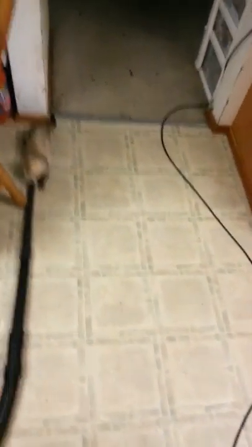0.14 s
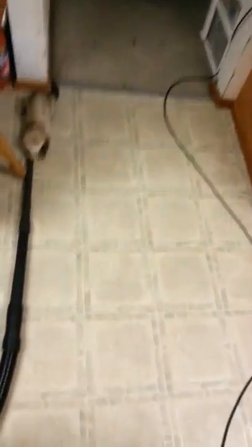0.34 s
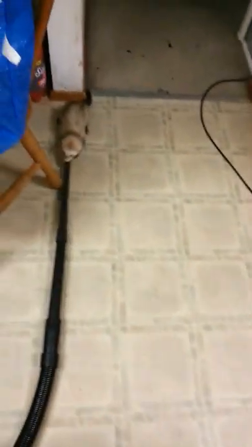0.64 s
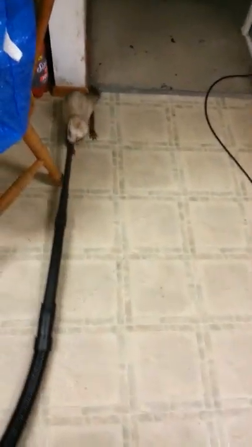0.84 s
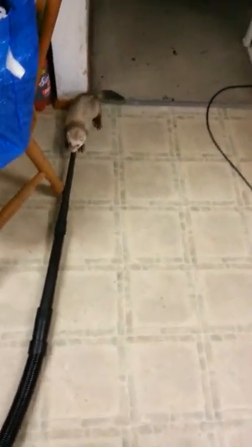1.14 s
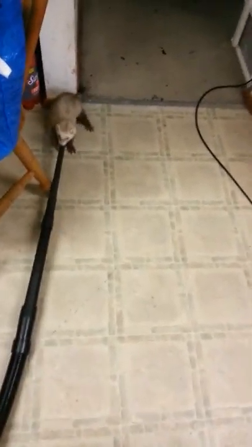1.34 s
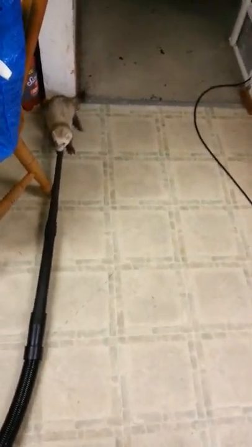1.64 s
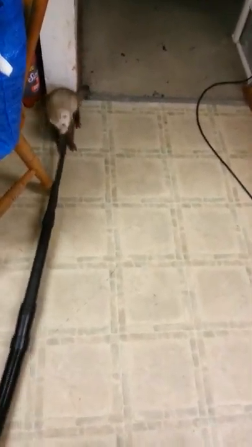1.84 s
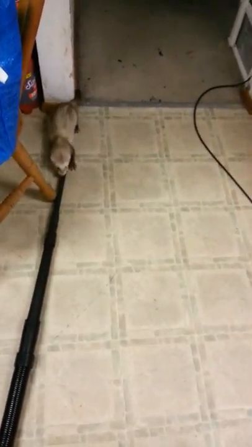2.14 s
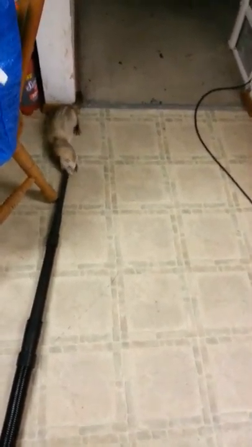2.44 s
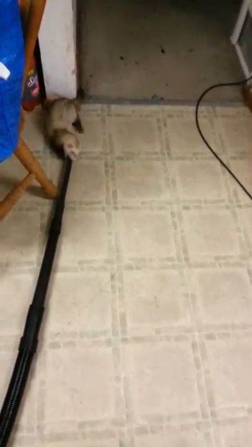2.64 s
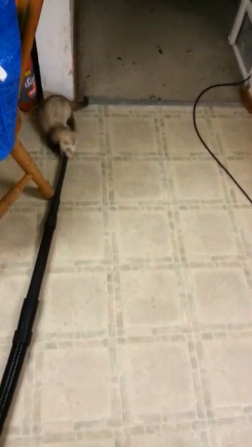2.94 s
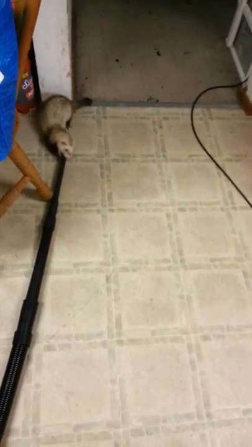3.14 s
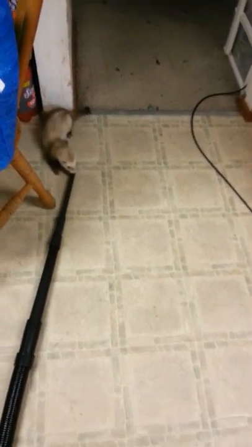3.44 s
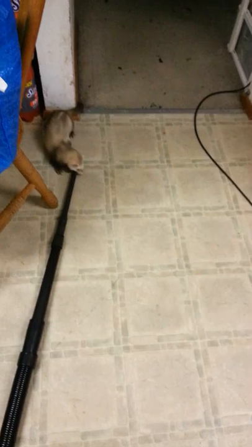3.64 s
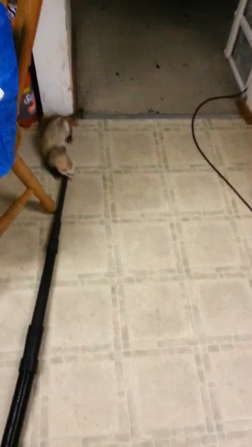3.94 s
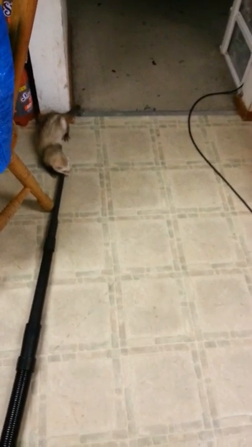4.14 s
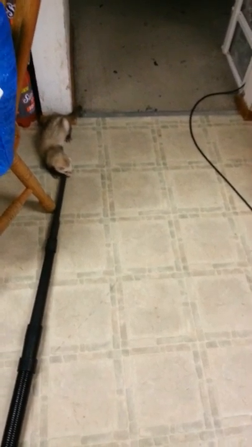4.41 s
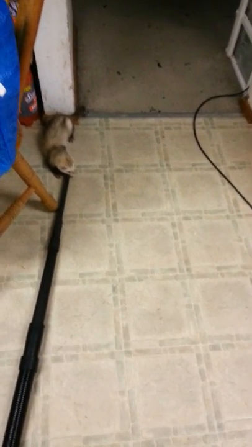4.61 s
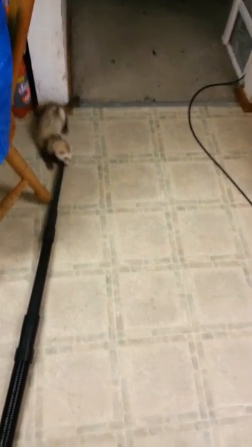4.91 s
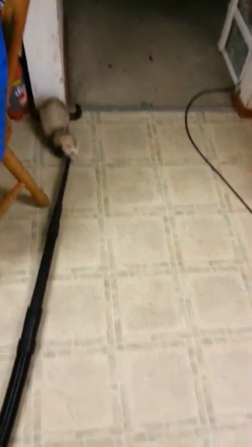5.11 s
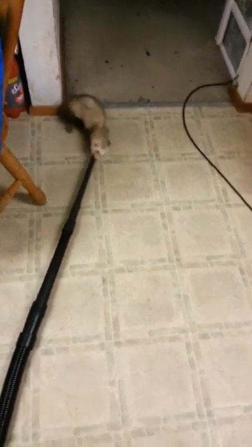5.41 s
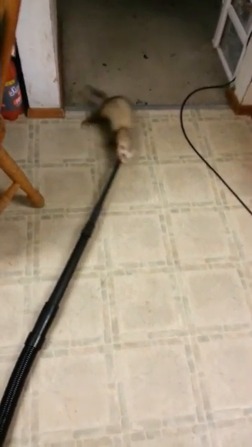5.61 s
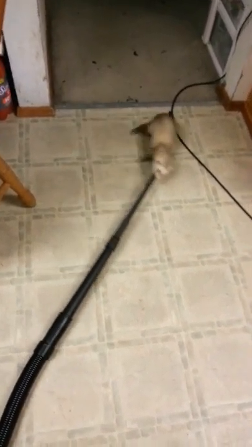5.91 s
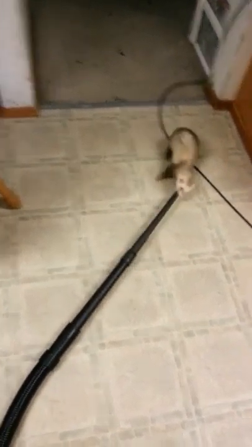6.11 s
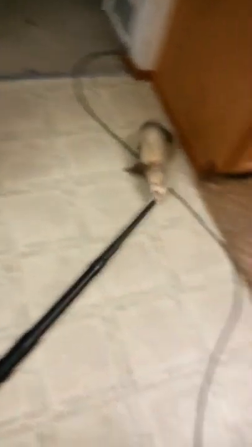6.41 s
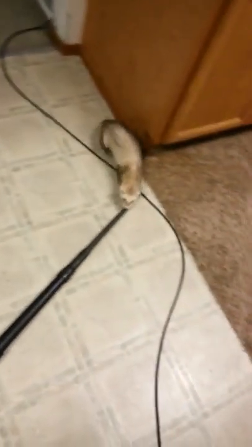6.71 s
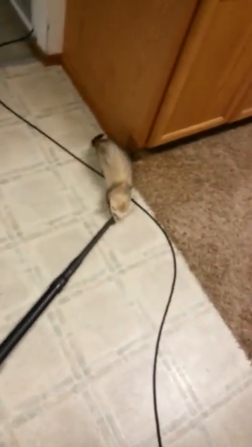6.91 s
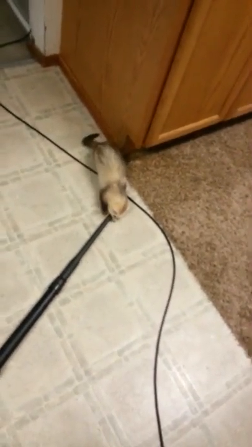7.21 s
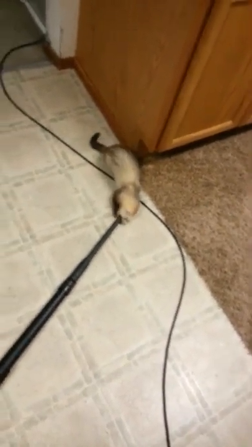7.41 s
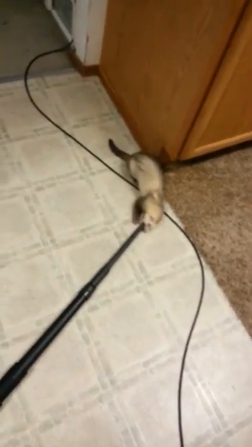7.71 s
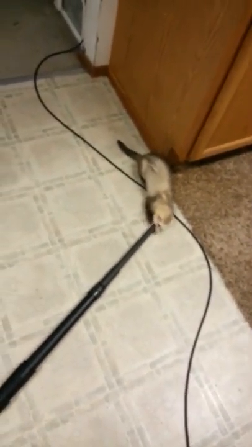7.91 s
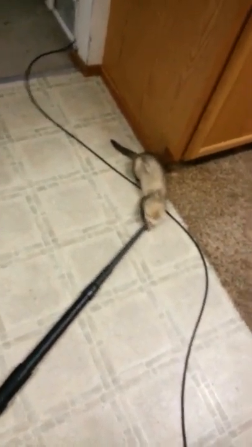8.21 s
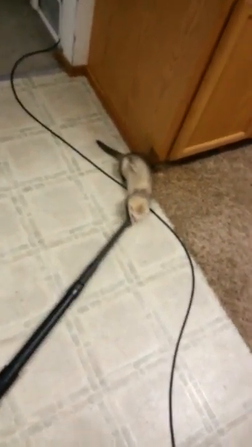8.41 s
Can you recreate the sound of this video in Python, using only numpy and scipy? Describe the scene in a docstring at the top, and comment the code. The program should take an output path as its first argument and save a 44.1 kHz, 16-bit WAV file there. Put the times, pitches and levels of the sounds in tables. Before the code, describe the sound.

A vacuum cleaner whines and roars, switches off and winds down, followed by a few light knocks and scuffs on a kitchen floor.

```python
"""Vacuum cleaner coasting down in a tiled kitchen

The motor whines (unbalance, fan blades, brushes), is switched off at 1.55 s and slows under drag.
Air roars through the hose and hisses at the nozzle; all of it fades with the shaft speed.
The plastic wand knocks on the floor a few times; small paws pat and scuff once the motor is quiet.
A phone with one microphone listens from standing height."""
import sys
import numpy as np
from scipy import signal
from scipy.fft import rfft, irfft, next_fast_len
from scipy.io import wavfile
from scipy.ndimage import uniform_filter1d, map_coordinates

SR = 44100
rng = np.random.default_rng(int(sys.argv[2]) if len(sys.argv) > 2 else 0)


def bounce(signal):
    """Save signal as a 16-bit WAV file at the path given by the first command-line argument."""
    frames = np.transpose(np.atleast_2d(signal))
    limited = np.clip(frames, -1, 1)
    pcm = np.round(limited * 32767).astype(np.int16)
    wavfile.write(sys.argv[1], SR, pcm)


N = 377055
OFF_S = 1.5525  # power cut


def amp(db):
    """dB to gain."""
    return 10 ** (np.asarray(db) / 20)


def unit(x):
    """x at rms 1."""
    return x / np.sqrt(np.mean(x ** 2) + 1e-20)


def along(points, hz):
    """(frequency, value) points read on a log axis."""
    point_hz, values = np.transpose(points)
    return np.interp(np.log(hz + 1), np.log(point_hz + 1), values)


def curves(rows):
    """One value per sample for each column after the time."""
    times_s, *columns = np.transpose(rows)
    return [np.interp(np.arange(N) / SR, times_s, column) for column in columns]


def wobble(rate_hz):
    """Smooth random curve, rate_hz knots a second."""
    knots = rng.standard_normal(int(N * rate_hz / SR) + 4)
    return map_coordinates(knots, [np.arange(N) * rate_hz / SR])


def filtered(x, response):
    """x through the gain response(hz)."""
    size = next_fast_len(len(x) + 8192)
    return irfft(rfft(x, size) * response(np.fft.rfftfreq(size, 1 / SR)), size)[:len(x)]


def rush(response, patchy_db):
    """Coloured noise, rms 1, with patches of random gain."""
    bins = signal.stft(rng.standard_normal(N + 512), nperseg=512)[2]
    patches = uniform_filter1d(rng.standard_normal(bins.shape), size=6, axis=0)
    patches = uniform_filter1d(patches, size=10, axis=1)
    noise = signal.istft(bins * amp(patchy_db * unit(patches)), nperseg=512)[1][:N]
    return unit(filtered(noise, response))


def pulse(spectrum, size=2048):
    """Minimum-phase pulse of this spectrum, peak 1."""
    db = np.maximum(along(spectrum, np.fft.rfftfreq(size, 1 / SR)), -100)
    cepstrum = irfft(np.log(amp(db)))
    cepstrum[1:size // 2] *= 2
    cepstrum[size // 2 + 1:] = 0
    wave = irfft(np.exp(rfft(cepstrum)))
    return wave / np.abs(wave).max()


def ring(hz, t60_s, attack_s):
    """Decaying sine."""
    t = np.arange(SR // 4) / SR
    return amp(-60 * t / t60_s) * (1 - np.exp(-t / attack_s)) * np.sin(2 * np.pi * hz * t)


def room_tail(build_up_s=0.0046):
    """Fresh kitchen reverb tail, energy 1; treble dies first."""
    # kitchen decay (frequency [Hz], t60 [s])
    decay = [(150, 0.48), (1000, 0.49), (4000, 0.42), (8000, 0.27), (14000, .08)]
    hz, t, bins = signal.stft(rng.standard_normal(SR // 2), SR, nperseg=256)
    tail = signal.istft(bins * amp(-60 * t / along(decay, hz)[:, None]), SR, nperseg=256)[1]
    tail *= 1 - np.exp(-np.arange(len(tail)) / SR / build_up_s)
    return tail / np.linalg.norm(tail)


def narrowing(t):
    """Nozzle state: 0 open, 1 narrow."""
    start_s, closing_s, end_s, opening_s = 1.0, 0.25, 1.935, 0.12
    return np.clip((t - start_s) / closing_s, 0, 1) * np.clip((end_s - t) / opening_s, 0, 1)


def shaft():
    """Speed [Hz] and its change since switch-off [decades]; air, bearings and brushes brake it."""
    # shaft under power (time [s], speed [Hz])
    powered = [(0.0, 488.5), (0.25, 485.8), (0.5, 485.0), (0.75, 489.1), (1.0, 495.5), (1.25, 498.1),
               (1.5, 500.1)]
    air_drag_per_turn, bearing_drag_per_s, friction_hz_per_s = 0.001497, 0.0376, 17.5
    drag_spared, step_s = 0.29, 0.005  # a narrow nozzle unloads the fan
    times_s = np.arange(OFF_S, N / SR, step_s)
    hz = [powered[-1][1]]
    for drag in air_drag_per_turn * (1 - drag_spared * narrowing(times_s[1:])):
        braking = drag * hz[-1] ** 2 + bearing_drag_per_s * hz[-1] + friction_hz_per_s
        hz.append(hz[-1] - step_s * braking)
    shaft_hz, = curves(powered + list(zip(times_s, hz)))
    return shaft_hz, np.log10(shaft_hz / hz[0]) * (np.arange(N) > OFF_S * SR)


def motor(shaft_hz, decades):
    """Shaft-locked tones; turbulence and walls make them flutter, the higher ones more."""
    # under power, listener moving (time [s], unbalance [dB], its octave [dB], blade octave [dB])
    powered_levels = [(0.0, -27.5, -35, -37.5), (0.28, -31.5, -36.5, -46), (0.56, -27, -35, -51),
                      (0.7, -25.5, -39, -38), (0.84, -24.5, -37.5, -43), (1.12, -21.5, -32.5, -34),
                      (1.28, -22, -33, -35), (1.5, -20, -27.5, -35)]
    # blade tone under power (time [s], level [dB])
    blade_levels = [(0.0, -23.5), (0.038, -19), (0.064, -29), (0.24, -19), (0.288, -22), (0.544, -20.5),
                    (0.582, -31), (0.682, -31), (0.702, -25.5), (0.832, -26), (0.858, -16), (0.88, -20.5),
                    (0.914, -26.5), (1.01, -19), (1.036, -27), (1.074, -20.5), (1.16, -21), (1.246, -29.5),
                    (1.308, -22), (1.394, -31), (1.462, -20.5), (1.55, -21)]
    # fixed resonances swept while coasting (frequency [Hz], level at full speed [dB])
    rocking = [(110, -66), (128, -48), (140, -37), (154, -48), (168, -38), (187, -46), (215, -33),
               (255, -35), (272, -33), (290, -24), (330, -31), (362, -32), (395, -23), (440, -16),
               (482, -30)]  # unbalance
    rocking_octave = [(380, -50), (435, -41), (460, -17.5), (505, -30), (540, -45), (1000, -37.5)]
    outlet = [(600, -62), (900, -42), (1050, -31.5), (1450, -32), (1800, -27), (1930, -23), (1980, -24),
              (2042, -15), (2110, -31), (2180, -24), (2225, -26), (2296, -22), (2400, -28.5), (2467, -16),
              (2510, -27), (2562, -13), (2620, -28), (2715, -33), (2770, -22.5), (2830, -33), (2935, -18),
              (3020, -29.5), (3140, -25.5), (3250, -23), (3370, -22.5), (3425, -31), (3490, -22.5)]  # blade tone via outlet and room modes
    outlet_octave = [(1000, -37), (1100, -40), (1220, -36), (1400, -43), (1650, -32), (1850, -37),
                     (1950, -42), (2020, -27.5), (2110, -47), (2200, -36), (2320, -36), (2550, -41),
                     (2900, -46), (3350, -29.5), (3700, -41.5), (4150, -35), (4800, -40.5), (6500, -46)]
    # brushes ticking over the commutator bars (harmonic, level before casing [dB])
    brush_harmonics = [(1, -45.5), (2, -50), (3, -50.5)]
    # casing resonances that let the brush tones out (frequency [Hz], gain [dB])
    casing = [(1200, -31.5), (1600, -20), (1850, -6), (2100, -7), (2330, -3), (2560, 3), (2650, -9),
              (2880, -8), (3100, -4), (3500, 1), (3850, -4), (4150, -2), (4400, -4), (4600, -1), (4800, -4),
              (5300, -7), (5800, -11), (6300, -14), (7500, -16), (9000, -31)]
    blades, bars = 7, 22
    tone_db_per_decade, brush_db_per_decade, swell_db, echo_db = 33, 18, 1.0, -7.5
    off = np.clip((np.arange(N) / SR - OFF_S) / 0.022, 0, 1)
    angle = 2 * np.pi * np.cumsum(shaft_hz) / SR

    def tone(order, db, flutter):
        envelope = unit(1 + flutter * wobble(45))
        return amp(db) * np.sqrt(2) * envelope * np.cos(order * angle + flutter * wobble(45))

    def shaft_tone(order, powered_db, resonances, flutter, extra_db=0):
        coasting_db = along(resonances, order * shaft_hz) + tone_db_per_decade * decades
        return tone(order, (1 - off) * powered_db + off * coasting_db + extra_db, flutter)

    def swell():
        return off * swell_db * wobble(14)

    low_db, low_octave_db, blade_octave_db = curves(powered_levels)
    blade_db, = curves(blade_levels)
    unbalance = shaft_tone(1, low_db, rocking, flutter=0.13)
    unbalance += shaft_tone(2, low_octave_db, rocking_octave, flutter=0.2)
    whine = shaft_tone(blades, blade_db, outlet, flutter=0.22, extra_db=swell())
    whine += shaft_tone(2 * blades, blade_octave_db, outlet_octave, flutter=0.42, extra_db=swell())
    for harmonic, db in brush_harmonics:
        order = harmonic * bars
        brush_db = db + brush_db_per_decade * decades + along(casing, order * shaft_hz)
        whine += tone(order, brush_db + swell(), flutter=0.42)
    whine *= np.clip((shaft_hz - 58) / 4, 0, 1)
    # the room holds earlier, higher pitches, which beat with the direct glide
    echo = amp(echo_db) * signal.fftconvolve(off * whine, room_tail())[:N]
    return unbalance + whine + echo


def air_roar(shaft_hz, decades):
    """Airflow through the resonant hose; dulls and fades as the fan slows."""
    # roar spectra, fan fast and slow (frequency [Hz], density [dB])
    fast_spectrum = [(35, -71.5), (60, -66), (110, -45), (150, -23), (240, -23), (385, -15.5), (485, -15.5),
                     (531, -16.5), (668, -15), (1130, -11.5), (1400, -12), (1900, -11), (3110, -14),
                     (3490, -11.5), (3740, -12.5), (6950, -28.5), (14500, -52.5)]
    slow_spectrum = [(35, -68.5), (60, -34.5), (125, -22.5), (255, -8.5), (321, -5.5), (474, -2), (653, -7),
                     (1670, -9), (1880, -10.5), (4490, -15), (14500, -65.5)]
    # hose resonances (frequency [Hz], width [Hz], boost [dB])
    hose_modes = [(431, 13, 6.5), (470, 69, 3.5), (593, 18, 10), (1187, 170, 3.5)]
    # roar before its fall with speed (time [s], level [dB])
    levels = [(0.0, -20), (0.28, -22), (0.56, -20.5), (0.7, -23), (0.84, -19.5), (1.12, -19.5),
              (1.28, -19.5), (1.5, -20.5), (1.75, -18), (1.95, -20), (2.1, -20)]
    db_per_decade = 38.5

    def hose(hz):
        return amp(sum(db / (1 + (2 * (hz - mode_hz) / width_hz) ** 2)
                       for mode_hz, width_hz, db in hose_modes))

    bright = rush(lambda hz: amp(along(fast_spectrum, hz)) * hose(hz), patchy_db=0.45)
    dull = rush(lambda hz: amp(along(slow_spectrum, hz)) * hose(hz), patchy_db=2.0)
    fast = np.clip((shaft_hz - 110) / 380, 0, 1)
    level_db = curves(levels)[0] + db_per_decade * decades + 0.58 * wobble(9)
    return amp(level_db) * (np.sqrt(fast) * bright + np.sqrt(1 - fast) * dull)


def nozzle_hiss(decades):
    """Air at the nozzle; louder while it is narrow, with brief surges."""
    # hiss spectrum (frequency [Hz], density [dB])
    spectrum = [(1500, -40), (3000, -2.5), (4500, 5), (7000, -3), (10000, -4.5), (12500, -14.5),
                (14600, -27)]
    # hiss surges (time [s], boost [dB], length [s])
    surges = [(0.36, 7, 0.18), (0.985, 8, 0.16), (1.25, 1.5, .3), (1.78, 2.5, 0.48), (3.776, 4.5, 0.12)]
    base_db, narrow_boost_db, db_per_decade = -34.5, 10.5, 43
    t = np.arange(N) / SR
    level_db = base_db + db_per_decade * decades + narrow_boost_db * narrowing(t)
    for start_s, boost_db, length_s in surges:
        age_s = t - start_s
        level_db += boost_db * np.clip(age_s / 0.02, 0, 1) * np.clip(2 - 2 * age_s / length_s, 0, 1)
    hiss = rush(lambda hz: amp(along(spectrum, hz)), patchy_db=0.7)
    return amp(level_db + 0.43 * wobble(15)) * hiss


def room_tone(level_db=-58):
    """Faint low noise of the still kitchen."""
    # background spectrum (frequency [Hz], density [dB])
    spectrum = [(15, -26), (25, -27.5), (53, -13), (80, -12), (120, -4.5), (160, -5.5), (240, -2.5),
                (350, -11.5), (480, -29), (678, -23.5), (1600, -26.5), (5860, -33), (14500, -34)]
    return amp(level_db) * rush(lambda hz: amp(along(spectrum, hz)), patchy_db=3.5)


def wand_ring():
    """Struck plastic wand; its wavering modes vary from blow to blow."""
    # wand modes (frequency [Hz], level [dB], t60 [s])
    modes = [(3760, -9, .05), (3970, -5, .1), (4145, -1, .26), (4200, 9, .016), (4310, -4, .1),
             (4570, -4, .12)]
    t = np.arange(SR // 4) / SR
    out = np.zeros(len(t))
    for hz, db, t60_s in modes:
        gain = amp(db + rng.normal(0, 2.3))
        mode = ring(hz * rng.normal(1, 0.0044), t60_s, attack_s=0.00046)
        waver = 1 + 0.4 * np.sin(2 * np.pi * (rng.uniform(25, 60) * t + rng.random()))
        out += gain * mode * waver
    return out


def early_echoes():
    """Impulse response: direct path, brief scatter and hard reflections."""
    # floor, then near walls (delay [s], gain [dB])
    reflections = [(.00143, -1), (.0066, -7), (0.013, -11), (0.0192, -10), (.028, -11)]
    t = np.arange(1600) / SR
    response = 0.18 * amp(-60 * t / 0.015) * rng.standard_normal(len(t))
    response[0] = 1
    for delay_s, db in reflections:
        response[round(delay_s * SR)] += amp(db)
    return response


def knocks():
    """Switch snap, wand knocks, paw pats: click, clack and thud ring wand, cupboards and floor."""
    # contacts (time [s], click [dB], then relative to it: clack [dB], thud [dB], wand ring [dB],
    # cupboard ring [dB], floor boom [dB], room tail [dB])
    power_switch = (1.558, -8, -8, -32, -29.5, -37.5, -36, 0)
    contacts = [(1.9978, 0.5, -9, -22, -27, -31, -20, 6.5),
                (3.2773, -5.5, -11, -16.5, -18.5, -35, -35, 2.5), (5.3078, -35, -0.5, 1.5, -33, 4, 2, 8.5),
                (5.3243, -39, 5.5, -13, -33, -10, -10, 8.8), (6.505, -36.5, 12, 9, -30, -9, -3, 8.2),
                (6.5077, -19.5, -19, -18, -16, -35, -28, 7.3), (7.004, -52.5, 10, 4.5, -30, 10.5, -8, 10.2),
                (7.144, -57.5, 12, 0.5, -30, 12, 0, 11), (7.512, -60.5, -6, 10.5, -30, 9, -3, 8.9),
                (7.741, -57.5, 10.5, 9, -30, 1, 14, 7.3), (8.052, -54.5, 4, 4.5, -30, 0.5, 10, 10)]
    # impact spectra (frequency [Hz], level [dB])
    click_spectrum = [(1000, -24.5), (2500, -1.5), (3600, 0), (4200, 2), (4900, -6), (6500, -15),
                      (8000, -18.5), (11000, -35), (14600, -39)]
    clack_spectrum = [(400, -40), (800, 8), (1400, 4), (2500, 4), (3500, -2), (6000, -32)]
    thud_spectrum = [(60, -45.5), (115, -21), (157, 5.5), (220, -2.5), (350, 4.5), (600, -4.5),
                     (1200, -26.5), (4000, -71.5)]
    click, clack, thud = pulse(click_spectrum), pulse(clack_spectrum), pulse(thud_spectrum)
    out = np.zeros(N + SR)
    for contact in [power_switch] + contacts:
        start_s, db, clack_db, thud_db, wand_db, cupboard_db, floor_db, room_db = contact
        blow = amp(db) * (click + amp(clack_db) * clack + amp(thud_db) * thud)
        near = np.convolve(early_echoes(), blow)
        far = amp(room_db) * signal.fftconvolve(blow, room_tail())
        cupboards = amp(cupboard_db) * ring(hz=312, t60_s=0.25, attack_s=0.001)
        floor = amp(floor_db) * ring(hz=157, t60_s=0.22, attack_s=0.008)
        rings = amp(db) * (amp(wand_db) * wand_ring() + cupboards + floor)
        for part, delay_s in (near, 0), (rings, 0), (far, 0.003):
            out[round((start_s + delay_s) * SR):][:len(part)] += part
    return out[:N]


def friction(length_s, centre_hz, width_hz):
    """One swelling and fading stroke of band noise, rms 1."""
    def band(hz):
        damping = (hz * width_hz) ** 2
        resonance = damping / ((centre_hz ** 2 - hz ** 2) ** 2 + damping)
        return resonance / (1 + (hz / max(6400, 2 * centre_hz)) ** 4)

    size = round(length_s * SR)
    return unit(filtered(np.hanning(size) * rng.standard_normal(size), band))


def scuffs(room_db=2.0):
    """Paws and wand drag over the floor: a scrape over a soft pad, plus room tail."""
    # strokes (time [s], length [s], scrape [dB], its centre [Hz], its width [Hz], pad [dB])
    strokes = [(6.05, 0.57, -68.5, 1190, 2000, -64.5), (6.069, 0.09, -71, 10000, 8000, -78),
               (6.381, 0.031, -59, 6700, 9000, -78), (6.388, 0.039, -60, 3500, 3000, -78),
               (6.75, 0.61, -80, 1500, 3000, -67.5), (6.998, 1, -73, 1490, 3460, -74),
               (7.099, 0.072, -65, 4200, 1400, -80), (7.106, 0.084, -59, 2500, 3520, -53.5),
               (7.355, 0.073, -66.5, 3430, 2500, -63), (7.604, 0.045, -64, 2350, 500, -77),
               (7.614, 0.041, -60, 1600, 2000, -80), (7.714, 0.019, -60.5, 3980, 1800, -62),
               (8.181, 0.048, -64, 3600, 3000, -56), (8.184, 0.04, -66, 2350, 500, -80)]
    out = np.zeros(N + SR)
    for start_s, length_s, scrape_db, centre_hz, width_hz, pad_db in strokes:
        scrape = amp(scrape_db) * friction(length_s, centre_hz, width_hz)
        pad = amp(pad_db) * friction(length_s, centre_hz=290, width_hz=340)
        near = scrape + pad
        far = amp(room_db) * signal.fftconvolve(near, room_tail())
        for part in near, far:
            out[round(start_s * SR):][:len(part)] += part
    return out[:N]


def scene():
    """Mono sum at the microphone."""
    shaft_hz, decades = shaft()
    vacuum = motor(shaft_hz, decades) + air_roar(shaft_hz, decades) + nozzle_hiss(decades)
    return (vacuum + room_tone() + knocks() + scuffs())[None]


def record(dry):
    """The phone clips at full scale and cuts all above its band limit."""
    top_hz = 14640
    return filtered(np.clip(dry[0], -1, 1), lambda hz: hz < top_hz)[None]


dry = scene()
out = record(dry)
bounce(out)
```